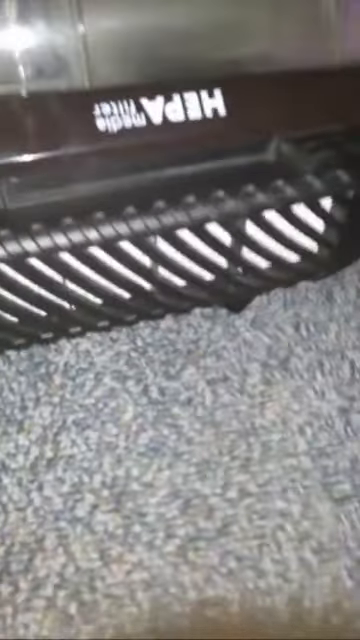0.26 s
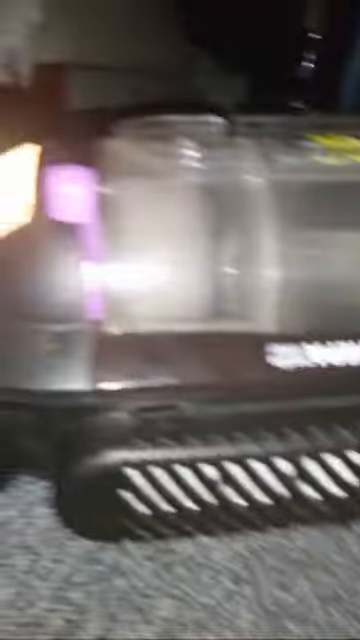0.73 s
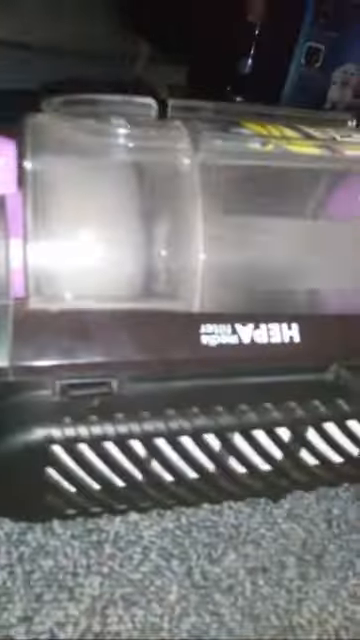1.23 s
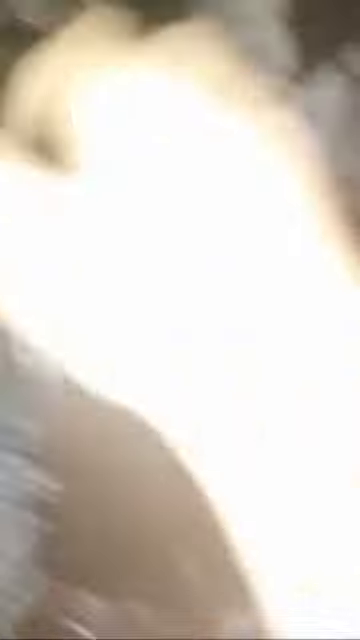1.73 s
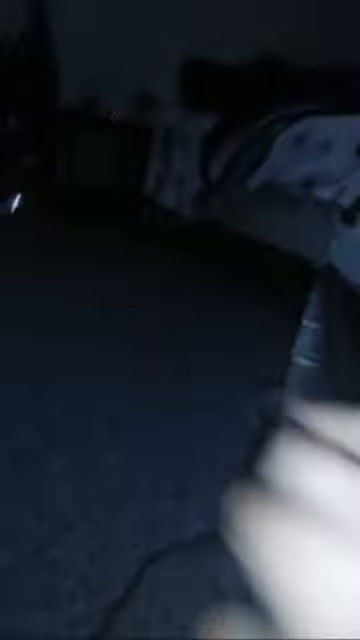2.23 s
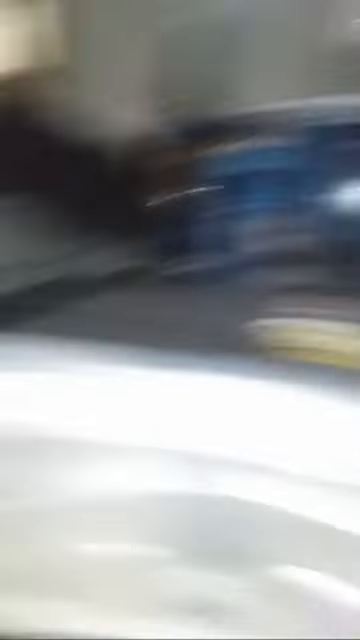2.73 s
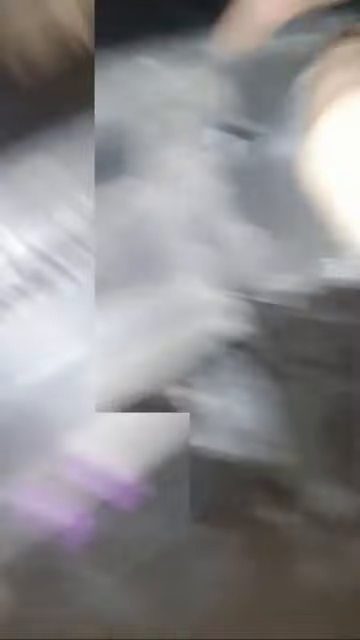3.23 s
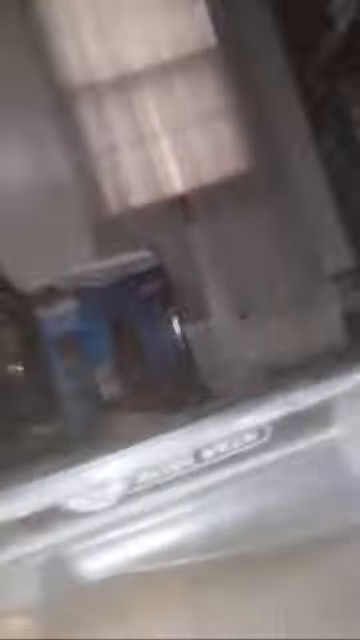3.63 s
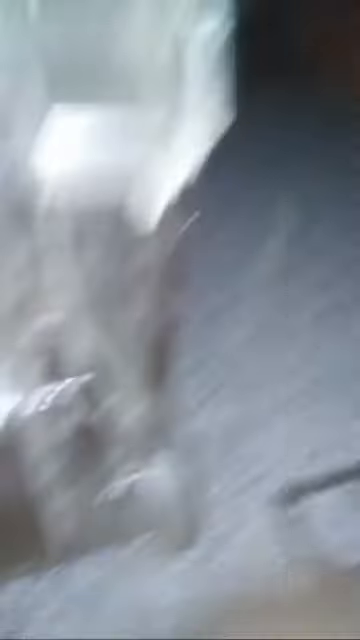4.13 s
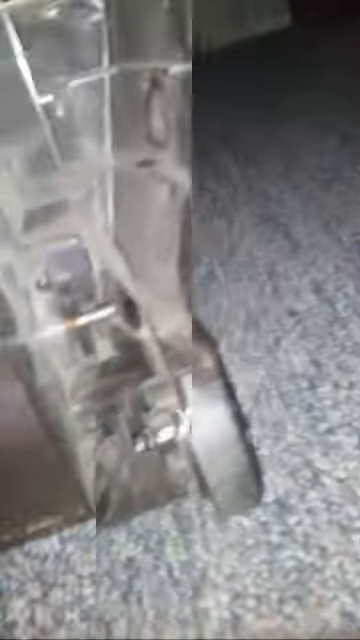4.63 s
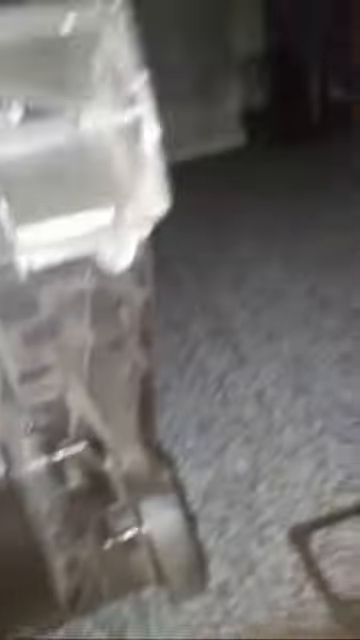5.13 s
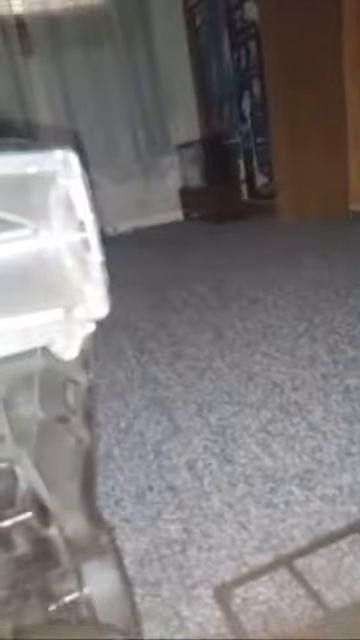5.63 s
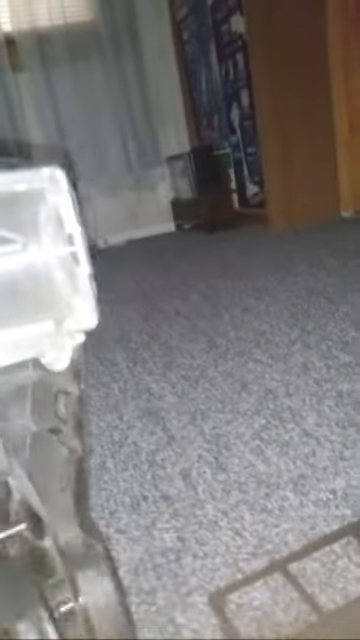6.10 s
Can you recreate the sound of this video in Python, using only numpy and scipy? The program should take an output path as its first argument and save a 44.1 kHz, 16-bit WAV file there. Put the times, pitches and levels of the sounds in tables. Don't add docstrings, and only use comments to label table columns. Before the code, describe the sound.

A vacuum cleaner runs at full speed very close to the microphone in a carpeted room: dense bright air hiss, duct roar, low hum and a piercing steady whine. At about 1.1 s it is switched off with a soft lurch, and the whine starts sliding down, quickly at first, then more slowly. Around 2.1 s a puff of air buffets the microphone; a hollow plastic knock lands at 2.45 and another at 2.85. The sound thins as the fan slows, with brief singing tones sweeping through the casing. Gritty plastic scrapes come at 3.5, knocks at 3.7, and a hard crack with a deep bump and air puff at 4.0. Brush rattle and thin hiss now stand out. At 5.2 s the machine is set down with a strong thud, rub and clack. A quiet, dull whir continues falling, with small ticks at 5.7 and a clearer click at 6.0, until the end near 6.4 s.

```python
import sys
import numpy as np
from scipy import signal
from scipy.fft import rfft, irfft, next_fast_len
from scipy.io import wavfile
from scipy.ndimage import uniform_filter1d, map_coordinates

SR = 44100
rng = np.random.default_rng(int(sys.argv[2]) if len(sys.argv) > 2 else 0)


def ratio_of_db(decibels):
    return 10 ** (np.asarray(decibels, float) / 20)


def wrap_up_sound(samples):
    columns = np.atleast_2d(samples).T
    tamed = np.clip(columns, -1, 1)
    steps = np.round(tamed * 32767).astype(np.int16)
    wavfile.write(sys.argv[1], SR, steps)


N = 280476
TIME = np.arange(N) / SR
FULL_HZ = 461.8


def unit(x):
    return x / np.sqrt(np.mean(x ** 2) + 1e-20)


def along(points, hz):
    f, v = np.transpose(points)
    return np.interp(np.log(hz + 1), np.log(f + 1), v)


def curve(rows):
    s, value = np.transpose(rows)
    return np.interp(TIME, s, value)


def flicker(count, rate):
    knots = rng.standard_normal(int(count * rate / SR) + 4)
    return map_coordinates(knots, [np.arange(count) * rate / SR])


def wobble(rate):
    return flicker(N, rate)


def swell(s, half):
    return np.exp(-((TIME - s) / half) ** 2)


def coloured(x, spectrum):
    m = next_fast_len(N + 8192)
    gain = ratio_of_db(along(spectrum, np.fft.rfftfreq(m, 1 / SR)))
    return unit(irfft(rfft(x, m) * gain, m)[:N])


def narrow(x, hz, width):
    return coloured(x, [(hz - 3 * width, -50), (hz - width / 2, -3), (hz, 0),
                        (hz + width / 2, -3), (hz + 3 * width, -50)])


def patchy(depth_db, x=None):
    z = signal.stft(rng.standard_normal(N) if x is None else x, nperseg=512)[2]
    field = uniform_filter1d(rng.standard_normal(z.shape), size=6, axis=0)
    field = uniform_filter1d(field, size=12, axis=1)
    return signal.istft(z * ratio_of_db(depth_db * unit(field)), nperseg=512)[1][:N]


def resonant(modes, valley_db, hz):
    grid = np.geomspace(hz.min(), hz.max() + 1, num=2000)
    power = ratio_of_db(2 * valley_db)
    for centre, width, db in modes:
        power = power + ratio_of_db(2 * db) / (1 + (2 * (grid - centre) / width) ** 2) ** 2
    return np.interp(hz, grid, np.sqrt(power))


# [t/s, 0 blowing, 1 tipped, 2 facing the microphone, 3 set down]
POSTURE = [
    (0, 0),
    (1.5, 0),
    (2.3, 1),
    (3.7, 1),
    (3.95, 2),
    (5.2, 2),
    (5.27, 3),
    (6.36, 3),
]


def held():
    return curve(POSTURE)


def shaft_speed():
    start_hz, settle_s, coast_s = 452.9, .3, 1.0767
    fan_drag, shift_hz, friction_hz = .0022604, 5.856, 85.49
    powered = FULL_HZ - (FULL_HZ - start_hz) * np.exp(-TIME / settle_s)
    left = np.arctan((FULL_HZ - shift_hz) / friction_hz)
    left = left - fan_drag * friction_hz * np.clip(TIME - coast_s, 0, None)
    coasting = shift_hz + friction_hz * np.tan(left)
    return uniform_filter1d(np.minimum(powered, coasting), size=3000)


TONE_ORDERS = (12, 22, 44, 66)
# [level/dB at full speed, loss/dB per tenfold slower shaft, top f/Hz let through]
TONE_LEVELS = [(-35, 28, 9000), (-47, 6, 7000), (-44, 11, 7900), (-44, 12, 7300)]
# [f/Hz, width/Hz, level/dB]
CASING = [(7500, 300, -4), (6600, 250, 1), (5900, 250, 1), (5520, 150, 0), (5150, 200, -2), (4300, 300, -2),
          (3650, 250, -1), (2950, 200, -1), (2550, 250, 0), (2050, 300, 1), (1650, 200, -2), (1300, 120, 0),
          (1050, 120, 0)]


def whistles(speed, angle, slower, near_db, powered):
    loaded_db, set_down_db, valley_db = 8, -6, -9
    follow = 0.3
    moved_db = follow * (near_db - near_db[0] / 2 - near_db.mean() / 2)
    resting = TIME > POSTURE[-2][0]
    out = np.zeros(N)
    for order, (db, loss_db, top_hz) in zip(TONE_ORDERS, TONE_LEVELS):
        hz = order * speed
        level_db = db + loaded_db * powered + loss_db * slower + moved_db + 4.0 * wobble(15)
        level_db = level_db + set_down_db * (order > 22) * resting
        gain = ratio_of_db(level_db) * resonant(CASING, valley_db, hz) / (1 + (hz / top_hz) ** 24)
        out += np.sqrt(2) * gain * np.sin(order * angle + .3 * wobble(40))
    return out


# [f/Hz, width/Hz, level/dB rms]
BODY = [(469.7, 52, -12.5), (374, 21, -24.5), (330, 29, -21), (294, 22, -28.5), (264, 14, -22),
        (244, 14, -24.5), (228.4, 18, -21), (205.7, 19, -22.5), (176.2, 11, -25.5), (162.6, 3.9, -26.5),
        (150.4, 20, -24.5), (131, 31, -30), (114, 14, -26.5), (91, 7.1, -32)]


def rotor_hum(speed, angle):
    gain = resonant(BODY, -49, speed) * np.clip(speed / 150, 0, 1) ** 4
    return np.sqrt(2) * gain * np.sin(angle + 0.073 * wobble(29.1))


# [f/Hz, level/dB rms]
MAINS = [(120, -31), (240, -37)]


def field_hum(powered):
    out = np.zeros(N)
    for hz, db in MAINS:
        out += np.sqrt(2) * ratio_of_db(db + 1.5 * wobble(8)) * np.sin(2 * np.pi * hz * TIME)
    return powered * out


def brushes(speed, angle):
    bar_db, spread_db, jagged_db = 1, 5, 4.5
    falling = np.maximum.accumulate(speed[::-1])[::-1]
    draw = rng.uniform(-1, 1, (230, 2))
    turn = (angle % (2 * np.pi)).astype(np.float32)
    rattle = np.zeros(N)
    for order, (size, phase) in enumerate(draw[13:], start=13):
        heard = np.searchsorted(-falling, -12000 / order)
        level_db = spread_db * size + bar_db * (order % 22 == 0) - 99 * (order in TONE_ORDERS)
        rattle[heard:] += ratio_of_db(level_db) * np.sin(order * turn[heard:] + np.float32(np.pi * phase))
    rattle = patchy(jagged_db, rattle)
    return rattle / np.sqrt(np.abs(uniform_filter1d(rattle ** 2, size=8192)) + 1e-9)


def drive(depth_db, rattle, speed):
    share = .45 * (1 - speed / speed.max()) ** 3
    return np.sqrt(share) * rattle + np.sqrt(1 - share) * unit(patchy(depth_db))


RUMBLE_LAW, DUCT_LAW, HISS_LAW = (-23.5, 32.3), (-20, 24.5), (-18.5, 9.7)
RUMBLE_TURN, DUCT_TURN, HISS_TURN = (0.41, -1.4, -0.018, -0.56), (0.45, -0.5, -6, -1), (3.8, 8.2, 3.7, 7)


def noise_levels(slower):
    levels = []
    for (full_db, loss_db), turn_db in ((RUMBLE_LAW, RUMBLE_TURN), (DUCT_LAW, DUCT_TURN), (HISS_LAW, HISS_TURN)):
        levels.append(full_db + loss_db * slower + np.interp(held(), range(len(turn_db)), turn_db))
    return levels


# [f/Hz, level/dB per Hz]
RUMBLE = [(59, -82), (100, -9), (166, -1.5), (291, -0.5), (409, -12), (450, -2.5), (580, -71), (990, -120)]
RUMBLE_SLOW = [(59, -60), (100, -4), (140, -27), (200, -5), (300, 6), (450, -2.5), (580, -25), (990, -120)]


def air_rumble(slow):
    swirl = patchy(2.0)
    return np.sqrt(1 - slow ** 3) * coloured(swirl, RUMBLE) + np.sqrt(slow ** 3) * coloured(swirl, RUMBLE_SLOW)


# [f/Hz, level/dB per Hz]
DUCT = [(280, -22), (480, -8.5), (494, -10.5), (544, -10), (736, -8.5), (817, -8.5), (1060, -7),
        (1370, -14.5), (1980, -8), (2420, -14), (2800, -13.5), (3640, -16), (6160, -120)]
DUCT_SLOW = [(280, -68), (480, -23), (620, -29), (811, -14), (1040, -13), (1360, -14), (2430, -10),
             (2800, -14), (3640, -46), (6160, -120)]


def duct_air(rattle, speed):
    stalled = np.clip(1 - speed / 110, 0, .6) / .6
    air = drive(2.0, rattle, speed)
    return np.sqrt(1 - stalled) * coloured(air, DUCT) + np.sqrt(stalled) * coloured(air, DUCT_SLOW)


# [f/Hz, level/dB per Hz]
BLOWING = [(1530, -27), (2600, -9), (3510, -2.5), (4840, -1.5), (5500, 2), (6980, -6), (7720, -15.5),
           (8340, -9.5), (8870, -7.5), (9800, -16.5), (12700, -36), (21600, -120)]
TURNED = [(1530, -55), (2600, -58), (2950, -10), (3340, -3.5), (3920, 4.5), (4660, 4), (5690, 12),
          (8340, 2.5), (9800, -28), (12700, -60), (21600, -120)]
COASTING = [(1530, -28), (2600, -8), (2830, -12), (3670, -4.5), (4580, -7.5), (5410, 0), (5660, 0.5),
            (6430, -1.5), (8340, -9.5), (9800, -38), (12700, -64), (21600, -120)]
RESTING = [(1530, -38), (2600, -20), (3190, -16), (3300, -11), (3710, -3), (4190, -11.5), (5500, -5.5),
           (6390, -11), (8670, -20.5), (9800, -44), (12700, -79), (21600, -120)]
# [f/Hz, width/Hz, level/dB against the housing]
HOLDERS = [
    (5600, 200, -17),
    (8300, 240, -21),
    (11230, 200, -36),
]
QUIET_DB = (6, -28, -16)


def housing_ring(shell, slow):
    out = np.zeros(N)
    for k, spectrum in enumerate((BLOWING, TURNED, COASTING, RESTING)):
        out += np.sqrt(np.clip(1 - abs(held() - k), 0, 1)) * coloured(shell, spectrum)
    out /= np.sqrt(uniform_filter1d(out ** 2, size=16384))
    quiet = np.clip((TIME - 5.85) / .15, 0, 1)
    for (hz, width, db), loss_db in zip(HOLDERS, QUIET_DB):
        out += slow * ratio_of_db(db + loss_db * quiet) * narrow(shell, hz, width)
    return out


# [f/Hz, level/dB per Hz]
HISS_FAST = [(5470, -6), (9300, -13), (10700, -12), (15500, -14)]
HISS_SLOW = [(5470, -30), (9300, 7.5), (10000, -12), (11000, 3), (11600, -8), (11900, -6), (14200, -7),
             (15500, -4)]


def leak_hiss(slow):
    return (np.sqrt(1 - slow) * coloured(patchy(1.2), HISS_FAST)
            + np.sqrt(slow) * coloured(patchy(1.3), HISS_SLOW))


DRAUGHT_DB = (-37.5, -44, -58.5, -62.5)
# [t/s, level/dB, rise/dB per s, fall/dB per s]
PUFFS = [
    (2.14, -28.5, 58, 54),
    (2.7, -56, 52, 35),
    (4.06, -29, 111, 190),
    (5.24, -46, 260, 240),
]
# [f/Hz, level/dB per Hz]
GUST = [(20, -60), (40, -25), (65, -4), (95, -1), (130, 7), (200, -62)]


def draught():
    gain = ratio_of_db(np.interp(held(), range(len(DRAUGHT_DB)), DRAUGHT_DB))
    for s, db, before_db, after_db in PUFFS:
        gain += ratio_of_db(db - np.where(TIME < s, before_db, after_db) * abs(TIME - s))
    return gain * ratio_of_db(-2.5) * coloured(patchy(2.5), GUST)


# [t/s, level/dB peak, f/Hz, t60/s]
THUDS = [
    (1.11, -19.5, 228.7, 0.49),
    (1.301, -23, 202, 0.34),
    (2.8537, -7, 324, 0.037),
    (4.02, -17, 129, 0.062),
    (4.041, -8.5, 102, 0.042),
    (5.162, -15, 119, 0.043),
    (5.224, -2, 97, 0.029),
    (5.708, -24.5, 208, 0.088),
    (5.739, -29, 174, 0.12),
]


def thuds():
    out, t = np.zeros(N + SR), np.arange(SR // 4) / SR
    for s, db, hz, t60 in THUDS:
        fade = ratio_of_db(db - 60 * t / t60) * (1 - np.exp(-t / 0.0015))
        out[round(s * SR):][:len(t)] += fade * np.sin(2 * np.pi * hz * t)
    return out[:N]


# [t/s, order,
# level/dB rms, half length/s]
SWELLS = [(1.19, 2, -29, .06), (1.25, 6, -28, .07), (1.26, 12, -32, .03), (1.35, 6, -21, .04),
          (1.83, 22, -33, .04), (1.66, 6, -34, .09), (1.85, 12, -36, .04), (1.91, 22, -30, .05),
          (2.0, 22, -31, .035), (2.19, 12, -33, .05), (2.42, 44, -35, .05), (2.62, 44, -38, .04),
          (2.67, 22, -37, .05), (2.91, 44, -30, .07), (3.21, 22, -38, .12), (3.19, 44, -30, .07),
          (3.22, 66, -42, .06), (3.38, 66, -40, .05), (3.44, 44, -31, .05), (3.5, 22, -41, .09),
          (3.57, 66, -42, .05), (3.68, 44, -44, .08), (3.78, 22, -45, .12), (3.87, 66, -36, .04),
          (3.88, 44, -46, .08), (3.97, 22, -40, .07), (4.04, 66, -39, .04), (4.04, 44, -38, .04),
          (4.1, 88, -36, .07), (4.26, 22, -43, .08), (4.31, 66, -26, .07), (4.41, 44, -44, .04),
          (4.53, 44, -39, .06), (4.58, 66, -40, .1), (4.72, 44, -42, .09), (4.8, 22, -43, .06),
          (4.99, 22, -46, .06), (5.17, 132, -33, .05), (5.36, 44, -43, .08), (5.48, 22, -48, .08),
          (5.52, 44, -45, .05), (5.51, 66, -39, .07), (5.72, 66, -43, .04), (5.57, 154, -48, .1),
          (5.73, 44, -46, .07), (5.9, 22, -42, .12), (5.92, 176, -57, .07), (6.21, 132, -37, .06),
          (6.22, 22, -49, .18), (6.32, 44, -43, .07),
          (1.5, 6, -38, .12), (2.33, 6, -39, .15), (2.52, 12, -39, .07), (2.66, 34, -35, .04),
                (2.72, 12, -41, .14), (3.06, 62, -43, .07), (3.2, 14, -40, .09), (3.28, 10, -40, .11),
                (3.56, 12, -48, .2), (3.6, 18, -46, .09), (4.14, 18, -53, .3), (4.21, 56, -42, .2),
                (4.23, 62, -30, .06), (4.3, 30, -43, .09), (4.58, 30, -57, .15), (4.74, 12, -58, .3),
                (4.77, 48, -43, .12), (4.82, 30, -46, .08), (4.85, 18, -50, .1), (4.88, 76, -32, .08),
                (4.88, 16, -57, .25), (4.94, 10, -55, .09), (4.97, 14, -53, .14), (5.02, 20, -50, .09),
                (5.41, 78, -55, .3), (5.41, 16, -58, .15), (5.48, 18, -59, .2), (5.59, 17, -59, .3),
                (5.65, 16, -59, .3), (5.74, 30, -61, .3), (5.32, 66, -43, .04), (2.82, 54, -44, .06),
                (1.3, 12, -28, .07), (5.86, 18, -58, .19), (5.86, 27, -59, .19), (6.2, 40, -61, .2),
                (2.49, 22, -41, .03), (4.21, 44, -42, .06), (4.32, 88, -42, .05), (4.76, 110, -43, .04),
                (5.54, 110, -45, .04), (5.6, 88, -45, .04), (5.84, 110, -45, .04), (2.78, 44, -40, .03),
                (4.12, 44, -43, .1), (5.175, 88, -27, .022), (1.85, 12, -36, .05)]


def panel_swells(angle):
    out, shake = np.zeros(N), .3 * wobble(70)
    for s, order, db, half in SWELLS:
        near = slice(round((s - 3 * half) * SR), round((s + 3 * half) * SR))
        t = TIME[near]
        gain = ratio_of_db(db) * np.exp(-((t - s) / half) ** 2) * ratio_of_db(2 * flicker(len(t), 35))
        out[near] += np.sqrt(2) * gain * np.sin(order * angle[near] + shake[near])
    return out


# [t/s, half length/s, rise of low
# air, housing, and hiss on top of housing: level/dB]
SWISHES = [(1.494, 0.24, 3, -1, 2), (1.793, 0.2, 0.5, -4.5, 1.5), (1.926, 0.14, 0, 4, 2),
           (2.185, 0.12, 1, 0.1, 5.5), (2.516, 0.19, 4, -2, 0), (3.272, 0.29, 2, -1.5, 1.5),
           (3.467, 0.013, 2, 8.5, -8), (3.777, 0.028, -9, -1.5, 14), (4.215, 0.24, 2, 0, 1.5),
           (4.807, 0.053, 2, 0, 11), (5.2, 0.027, -6, -1, -4), (5.555, 0.15, -3, 0.5, -1),
           (5.764, .06, 1.5, -2, 1), (6.152, 0.25, 2, 0.5, -22), (5.872, 0.17, -1.5, -0.5, -6),
           (5.49, .04, 1, 0, -1), (6.13, 0.037, -1, -2, 7), (6.025, 0.027, 2.5, -1.5, 3),
           (5.607, .08, -0.5, 0, -3), (6.195, .06, -1, 0, -2), (6.24, 0.04, -0.5, 0, 0)]


def swishes():
    air, shell, hiss = np.zeros((3, N))
    for s, half, air_db, low_db, high_db in SWISHES:
        stroke = swell(s, half)
        air += air_db * stroke
        shell += low_db * stroke
        hiss += (low_db + high_db) * stroke
    return air, shell, hiss


# [t/s, half length/s, f/Hz,
# width/Hz, level/dB rms]
CAVITIES = [(1.7, 0.29, 1100, 110, -32), (2.304, 0.26, 1007, 110, -29.5), (2.6, 0.11, 1690, 200, -33),
            (2.6, 0.13, 846, 248, -31.5), (2.05, 0.27, 2880, 700, -33.5), (1.996, 0.21, 1640, 400, -32),
            (1.565, 0.02, 3800, 400, -24), (2.29, 0.027, 6340, 400, -37), (2.354, 0.075, 7500, 503, -30),
            (2.403, 0.18, 5530, 250, -39), (2.707, .1, 6800, 400, -39), (2.76, 0.17, 5630, 250, -49),
            (3.4716, 0.0034, 4200, 700, -10.5), (3.479, .006, 4140, 500, -19),
            (3.494, 0.0036, 4300, 600, -22), (3.729, 0.0055, 3560, 900, -23.5),
            (3.763, .003, 5700, 600, -31), (3.975, 0.12, 5640, 200, -36), (4.256, 0.16, 5800, 250, -24),
            (4.496, .3, 610, 160, -48.5), (4.52, 0.16, 3630, 250, -45), (4.75, 0.056, 5500, 250, -30),
            (4.768, .05, 7050, 600, -36), (4.876, 0.077, 5430, 220, -25.5),
            (5.078, 0.044, 5400, 250, -28.5), (5.172, 0.019, 5600, 300, -28),
            (5.956, 0.014, 5300, 500, -36), (6.125, 0.19, 5500, 218, -41)]


def cavities(shell):
    out = np.zeros(N)
    for s, half, hz, width, db in CAVITIES:
        out += ratio_of_db(db) * swell(s, half) * narrow(shell, hz, width)
    return out


# [t/s, level/dB peak, ring f/Hz, t60/s, crack level/dB]
KNOCKS = [(2.4538, 0, 390, 0.022, -5.5), (2.460, -2, 840, 0.026, -30), (2.8531, -3.5, 614, 0.022, -7),
          (3.337, -9, 337, 0.01, -20), (3.7178, -2.5, 487, 0.014, -3), (3.7281, -7.5, 336, 0.017, -8),
          (3.8, -12, 377, 0.013, -20), (3.812, -31, 900, 0.0088, -3), (3.962, -21, 198, 0.031, -22),
          (4.011, -3, 707, 0.017, 2), (4.0284, 17, 930, 0.0034, -26), (4.882, -25, 346, 0.028, -23),
          (5.16, -13.5, 171, 0.05, -10), (5.283, 1, 594, 0.034, -15), (5.287, -15.5, 229, 0.089, 4),
          (5.376, -23.5, 374, 0.064, -16), (5.704, -21, 350, 0.028, -35), (5.735, -21, 344, 0.035, -35),
          (5.993, -24.5, 519, 0.083, -6), (5.9949, -23.5, 2050, 0.043, -30), (5.994, -16, 840, 0.039, 2.5),
          (6.295, -38, 357, 0.14, -20)]
# [f/Hz, level/dB]
UPPER_RING = [(170, -17), (315, 1), (350, -6), (410, -1.5), (610, -24), (690, -1.5), (840, -14)]
CRACK_HZ = (900, 5660)


def knocks():
    out, t = np.zeros(N + SR), np.arange(SR // 4) / SR
    hollow = signal.butter(2, (250, 1300), "band", fs=SR, output="sos")
    snap = signal.butter(6, CRACK_HZ, "band", fs=SR, output="sos")
    for s, db, hz, t60, crack_db in KNOCKS:
        fade = ratio_of_db(-60 * t / t60) * (1 - np.exp(-t / .0009))
        turn = 2 * np.pi * hz * t
        ring = -np.sin(turn) - ratio_of_db(along(UPPER_RING, hz)) * np.sin(1.89 * turn) + 0.02 * np.sin(0.78 * turn)
        panels = unit(signal.sosfilt(hollow, rng.standard_normal(len(t))))
        burst = fade * ratio_of_db(-60 * t / 0.04) * rng.standard_normal(len(t))
        crack = ratio_of_db(crack_db + 4.0) * signal.sosfilt(snap, burst)
        out[round(s * SR):][:len(t)] += ratio_of_db(db) * (fade * (ring + 0.29 * panels) + crack)
    return out[:N]


# [t/s, level/dB rms, rise/s, fall/s, low part level/dB]
SCUFFS = [
    (3.458, -20, 0.0026, 0.0072, -24),
    (3.47, -16, .003, 0.0091, -17),
    (3.488, -16.5, 0.0018, 0.0037, -11),
    (3.497, -21.5, 0.0049, 0.011, -7),
    (3.769, -33, 0.031, 0.039, -3.5),
    (5.212, -12.5, 0.013, 0.012, -11.5),
    (5.228, -16.5, 0.0067, 0.0068, -6),
    (5.19, -25.5, 0.027, 0.0093, -7),
]
# [f/Hz, level/dB per Hz]
SCRAPE = [(880, -10.5), (1500, -17), (3030, -5), (3410, -5), (4570, -1), (5290, -3), (5780, -8.5),
          (7740, -21.5), (8450, -14.5), (15500, -74)]
SCRAPE_LOW = [(100, -24), (250, -7.5), (900, -14.5), (1800, -18), (2500, -30.5)]


def scuffs():
    out = np.zeros(N)
    grit = rng.standard_normal(N) * ratio_of_db(1.4 * wobble(500))
    high, low = coloured(grit, SCRAPE), coloured(grit, SCRAPE_LOW)
    for s, db, rise, fall, low_db in SCUFFS:
        stroke = swell(s, np.where(TIME < s, rise, fall))
        out += ratio_of_db(db) * stroke * (high + ratio_of_db(low_db) * low)
    return out


# [f/Hz, t60/s]
ROOM = [(200, 0.53), (600, 0.23), (1500, 0.034), (8000, 0.32)]


def room(x):
    hz, t, z = signal.stft(rng.standard_normal(SR // 2), SR, nperseg=256)
    tail = signal.istft(z * ratio_of_db(-60 * t / along(ROOM, hz)[:, None]), SR, nperseg=256)[1]
    return signal.fftconvolve(np.pad(x, (200, 0)), tail / np.linalg.norm(tail))[:N]


# [t/s, level/dB]
NEARNESS = [(0, -15), (1.3, -13.5), (1.57, -15.5), (1.66, -17.5), (1.83, -22.5), (2.16, -28), (2.32, -23),
            (2.62, -25.5), (3.15, -25.5), (3.45, -28.5), (3.82, -32), (4.04, -25), (4.29, -28.5),
            (4.53, -31), (4.87, -25.5), (5.22, -28), (5.245, -32.5), (6.36, -35.5)]


def motor():
    speed = shaft_speed()
    angle = 2 * np.pi * np.cumsum(speed) / SR
    slower = np.log10(speed / FULL_HZ)
    powered = ratio_of_db(-60 * np.clip(TIME - 1.11, 0, None) / .15)
    near_db = curve(NEARNESS)
    slow = np.clip(held() / 2, 0, 1)
    rattle = brushes(speed, angle)
    shell = drive(1.7, rattle, speed)

    tones = whistles(speed, angle, slower, near_db, powered) + rotor_hum(speed, angle) + field_hum(powered)
    tones += panel_swells(angle) + cavities(shell)

    rumble_db, duct_db, hiss_db = noise_levels(slower)
    air_swish, shell_swish, hiss_swish = swishes()
    flutter = 0.33 * wobble(14)
    rumble = ratio_of_db(rumble_db + air_swish + 0.9 * wobble(9.8)) * air_rumble(slow)
    duct = ratio_of_db(duct_db + 1.38 * air_swish + flutter) * duct_air(rattle, speed)
    housing = ratio_of_db(near_db + shell_swish + 0.5 + flutter) * housing_ring(shell, slow)
    hiss = ratio_of_db(near_db + hiss_db + hiss_swish + 1.1 * wobble(7.7)) * leak_hiss(slow)
    return tones + rumble + duct + housing + hiss


def scene():
    hands = thuds() + knocks() + scuffs()
    mono = motor() + draught() + hands + ratio_of_db(-13.0) * room(hands)
    return np.array([mono, mono])


def band_limit(x):
    return signal.sosfilt(signal.butter(12, 15700, fs=SR, output="sos"), x)


# [t/s, level/dB]
SLIPS = [
    (.545, -4),
    (.945, -15),
    (3.02, -10),
    (5.0, -7),
]


def record(dry):
    x = signal.sosfilt(signal.butter(3, 62, "high", fs=SR, output="sos"), dry)
    x = x / (1 + np.abs(x / 1.05) ** 6) ** (1 / 6)
    bright = signal.butter(14, 4400, "high", fs=SR, output="sos")
    treble = signal.sosfilt(bright, np.roll(x[0], 500))
    slip = treble * sum(ratio_of_db(db) * swell(s, .013) for s, db in SLIPS)
    top_cut = signal.ellip(10, .1, 60, 15700, fs=SR, output="sos")
    x = signal.sosfiltfilt(top_cut, x + [slip, -slip])
    return band_limit(x)


dry = scene()
out = record(dry)
wrap_up_sound(out)
```